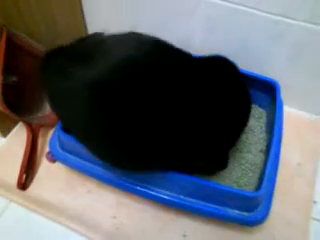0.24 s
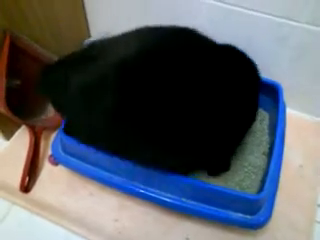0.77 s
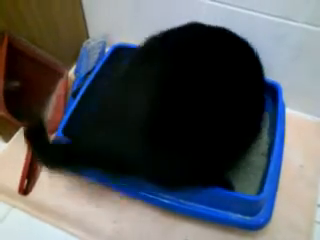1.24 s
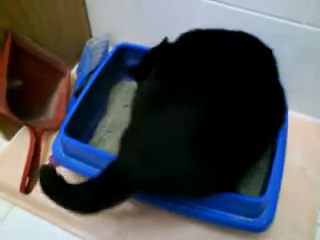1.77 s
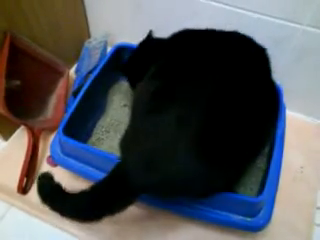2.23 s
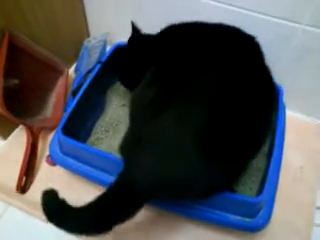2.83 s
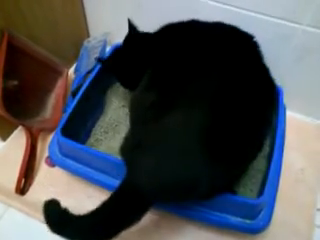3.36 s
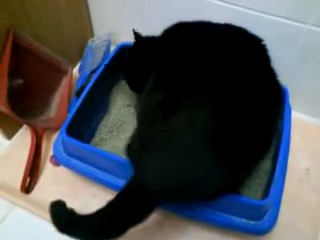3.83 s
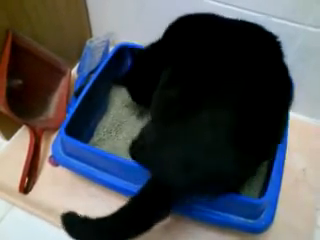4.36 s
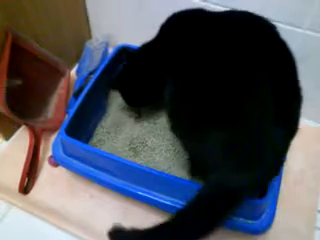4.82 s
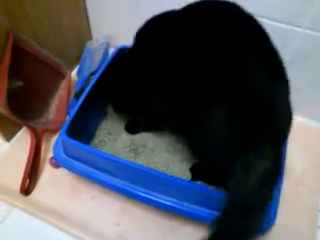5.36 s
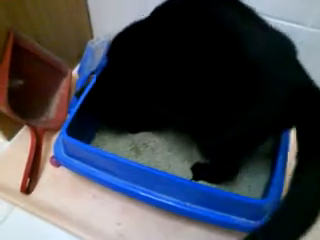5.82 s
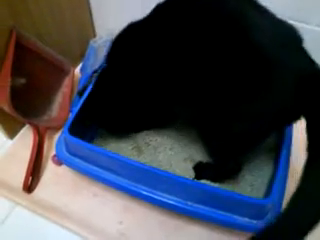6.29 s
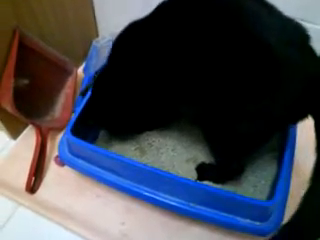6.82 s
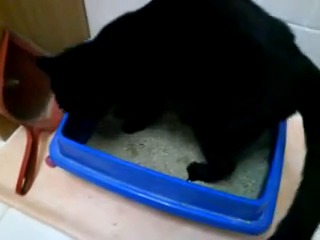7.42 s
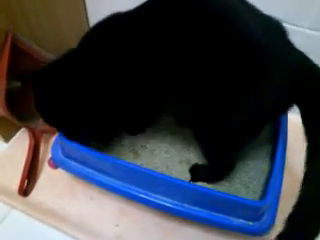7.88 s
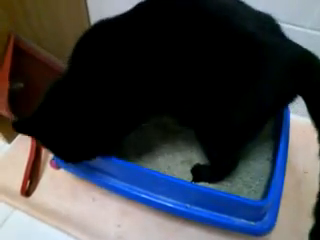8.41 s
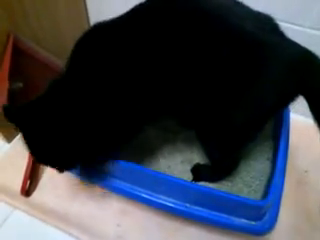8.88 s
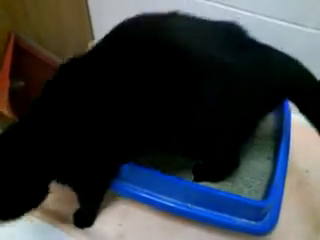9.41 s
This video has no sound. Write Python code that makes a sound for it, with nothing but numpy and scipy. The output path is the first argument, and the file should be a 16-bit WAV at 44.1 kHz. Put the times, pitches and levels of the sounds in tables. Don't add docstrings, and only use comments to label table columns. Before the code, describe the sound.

Dry granular litter is scratched in a thin plastic tray, heard close with short hard echoes from tiles and faint hiss beneath. Soft rustles and clicks come first, then a dense run of gritty scraping strokes with hollow knocks. After a lull with a few paw thuds, a sharp clatter and a couple of looser strokes return, then a small scrape and a faint step out.

```python
import sys
import numpy as np
from scipy import signal
from scipy.io import wavfile
from scipy.ndimage import uniform_filter1d

SR = 44100
rng = np.random.default_rng(int(sys.argv[2]) if len(sys.argv) > 2 else 0)


def attenuation_scalar(level_db):
    decades = np.asarray(level_db, float) / 20
    return 10 ** decades


def store_wav(level_fs):
    pcm = np.round(np.clip(np.atleast_2d(level_fs), -1, 1) * 32767)
    wavfile.write(sys.argv[1], SR, pcm.T.astype(np.int16))


N = 425609
T = np.arange(N) / SR
MUFFLE = 4.48
# (f/Hz, width/Hz, level/dB)
GRIT_MODES = [(2457, 630, 2.5), (3150, 439, 3), (3830, 483, 1), (4655, 342, -1.5), (5335, 850, 1),
              (6647, 574, -7)]


def evened(x):
    return x / np.sqrt(np.mean(x ** 2) + 1e-20)


def read(points, hz):
    f, value = np.transpose(points)
    return np.interp(np.log(hz + 1), np.log(f + 1), value)


def hiss():
    # (f/Hz, level/dB)
    floor_colour = [(20, -10), (60, 2), (120, -7.5), (222, -6), (374, -16), (827, -16), (1290, -18.5),
                    (2500, -23), (4580, -24.5), (7000, -30)]
    hz = np.fft.rfftfreq(1024, 1 / SR)
    real, imaginary, patches = rng.standard_normal((3, len(hz), N // 256 + 5))
    patches = uniform_filter1d(uniform_filter1d(patches, 14, axis=0), 12, axis=1)
    colour_db = read(floor_colour, hz)[:, None] + 1.4 * evened(patches)
    z = (real + 1j * imaginary) * attenuation_scalar(colour_db)
    noise = signal.istft(z, nperseg=1024, noverlap=768)[1][:N]
    return attenuation_scalar(-51.5) * evened(noise)


def rumble():
    # (t/s, level/dB)
    hand_shake = [
        (0, -67),
        (4.55, -63),
        (4.65, -45),
        (4.82, -50.5),
        (4.9, -61.5),
        (9.65, -60),
    ]
    s, db = np.transpose(hand_shake)
    low_band = signal.butter(2, [8, 25], "bandpass", fs=SR, output="sos")
    shake = signal.sosfilt(low_band, rng.standard_normal(N))
    return attenuation_scalar(np.interp(T, s, db)) * evened(shake)


def tiles(x):
    # (f/Hz, t60/s)
    room_decay = [(300, 0.25), (1500, 0.33), (6000, 0.1)]
    echoes = np.zeros(SR // 2)
    at = np.arange(100, SR // 2 - 20, 20)
    echoes[at + rng.integers(0, 20, len(at))] = rng.choice([-1., 1.], len(at))
    hz, t, z = signal.stft(echoes, SR, nperseg=256)
    decay = attenuation_scalar(-60 * t / read(room_decay, hz)[:, None])
    tail = signal.istft(z * decay, SR, nperseg=256)[1]
    return signal.fftconvolve(x, tail / np.linalg.norm(tail))[:N]


def ring(modes, widen=1):
    t = T[:4096]
    tap = np.zeros(len(t))
    for k, (hz, width, db) in enumerate(modes):
        decay = np.exp(-np.pi * width * widen * t)
        tap += (-1) ** k * attenuation_scalar(db) * np.sqrt(width) * decay * np.sin(2 * np.pi * hz * t)
    tap *= 1 - np.exp(-t * modes[0][0] / (0.43 * widen))
    return tap / np.linalg.norm(tap)


def granules(per_s, spread_db, clump):
    size = attenuation_scalar(spread_db * np.minimum(rng.exponential(1, N), 5)) * rng.choice([-1., 1.], N)
    lands = rng.random(N) < per_s / SR
    return evened(size * lands * attenuation_scalar(clump))


def rubs():
    # (start t/s, end t/s, f/Hz, width/Hz, level/dB)
    rubbed_spots = [(0.35, 0.386, 1800, 200, -50), (0.895, 1.004, 1100, 300, -50),
                    (0.898, 0.924, 1980, 200, -50), (1.247, 1.483, 170, 120, -51),
                    (1.25, 1.46, 270, 59.7, -43), (1.286, 1.453, 880, 250, -48),
                    (1.312, 1.353, 3930, 180, -47), (1.44, 1.494, 4150, 350, -59),
                    (6.96, 7.008, 3800, 200, -50), (6.367, 6.421, 4500, 900, -29.5),
                    (6.953, 6.985, 2070, 250, -49), (1.306, 1.346, 2250, 250, -48),
                    (3.064, 3.14, 2220, 200, -38.5), (3.584, 3.702, 2110, 300, -47),
                    (3.315, 3.473, 1460, 130, -36), (4.592, 4.62, 1300, 900, -51),
                    (7.736, 7.767, 1100, 906, -51), (4.221, 4.31, 1430, 200, -55.5),
                    (4.24, 4.307, 640, 150, -59), (5.41, 5.53, 1040, 500, -53),
                    (5.8, 5.895, 487, 199, -45.5), (6.08, 6.212, 1090, 250, -46.5),
                    (6.654, 6.775, 171, 100, -51.5), (6.762, 6.81, 4920, 200, -61),
                    (7.886, 8.09, 1110, 400, -43), (9.257, 9.335, 980, 300, -52.5),
                    (9.455, 9.597, 1980, 497, -57.5)]
    out, taps = np.zeros(N), granules(3000, 1.7, 0)
    for start, end, hz, width, db in rubbed_spots:
        part = slice(round(start * SR), round(end * SR))
        stroke = taps[part] * signal.windows.tukey(part.stop - part.start, .4)
        tone = signal.fftconvolve(stroke, attenuation_scalar(db) * ring([(hz, width, 0)]))
        out[part.start:][:len(tone)] += tone[:N - part.start]
    return out


def pop():
    # (t/s, peak level/dB, f/Hz, t60/s)
    claw_pops = [(.48, -44, 4000, .0043), (.9507, -24, 260, .012), (.954, -37, 1220, .022),
                 (1.254, -35, 350, .018), (1.4325, -36, 2400, .008), (1.4325, -38.5, 5600, .006),
                 (1.486, -26, 180, .01), (1.728, -32, 3400, .0026), (2.1402, -30.5, 900, .0043),
                 (2.5625, -24, 5500, .006), (2.574, -25, 5500, .006), (2.6652, -19, 890, .007),
                 (2.6655, -24, 1600, .006), (2.7685, -28, 1500, .014), (3.1545, -25, 5200, .004),
                 (3.1547, -20.5, 2600, .0062), (3.7946, -34.5, 1400, .013), (4.386, -41.5, 3500, .0034),
                 (4.598, -41, 1300, .011), (4.9865, -32, 620, .015), (5, -42, 1150, .012),
                 (5.2577, -34, 2200, .005), (5.2578, -42, 4400, .004), (5.26, -32, 620, .02),
                 (6.0824, -25.5, 1500, .0044), (6.398, -15, 2000, .006), (6.631, -38, 2100, .008),
                 (6.667, -24, 2220, .0072), (6.667, -36.5, 3400, .01), (6.668, -28, 1250, .008),
                 (6.8179, -22.5, 1200, .0067), (7.0128, -19.5, 660, .013), (7.013, -22, 1700, .007),
                 (7.0145, -21, 5100, .004), (8.049, -23, 990, .0061), (9.205, -33.5, 4850, .004),
                 (9.205, -36, 1100, .007)]
    out, ticks = np.zeros(N), np.zeros(N)
    for s, db, hz, t60 in claw_pops:
        t = np.maximum(T - s, 0)
        onset = 1 - np.exp(-t * hz / 0.33)
        out += 1.78 * attenuation_scalar(db - 60 * t / t60) * np.sin(2 * np.pi * hz * t) * onset
        ticks[round(s * SR)] += attenuation_scalar(db) * min(hz / 1500, 1)
    return out + .22 * signal.oaconvolve(ticks, ring(GRIT_MODES, MUFFLE))[:N]


def slaps():
    # (t/s, level/dB, f/Hz)
    pad_slaps = [
        (1.7275, -21.5, 704),
        (4.3854, -30, 1000),
        (5.2574, -16, 634),
    ]
    out = np.zeros(N)
    for s, db, hz in pad_slaps:
        turn = np.clip((T - s) * hz, 0, 1)
        out += attenuation_scalar(db) * np.sin(2 * np.pi * turn) * np.sin(np.pi * turn)
    return out


def knocks(column):
    # (t/s, floor level/dB, rim level/dB, grit level/dB)
    knock_rows = [(.37, -47, -38, -57), (0.421, -54.5, -33.5, -57.5), (.951, -35, -30, -49.5),
                  (1.342, -53, -49, -39), (1.433, -48, -39, -34), (1.468, -46, -43, -39),
                  (1.757, -29, -28, -36), (2.14, -20.5, -27, -21), (2.262, -18, -20, -42),
                  (2.284, -26, -18, -31), (2.446, -16, -39, -19), (2.562, -45, -44, -23),
                  (2.664, -19.5, -22, -29), (2.682, -27, -28, -20.5), (2.769, -34, -23, -26.5),
                  (3.154, -35, -19.5, -20), (3.305, -38, -47, -37), (3.793, -42, -43, -41),
                  (4.597, -50, -37, -41), (4.986, -34, -32, -48), (5.853, -43, -32, -36.5),
                  (6.079, -45, -45, -32.5), (6.1, -39.5, -28, -37), (6.369, -29, -19, -19),
                  (6.374, -22, -12, -15.5), (6.395, -28, -21, -29), (6.667, -32, -22, -34),
                  (6.926, -40, -38, -38), (7.012, -38, -35, -38), (7.739, -47, -39.5, -43),
                  (9.204, -61.5, -53, -37)]
    scatter_t60 = 0.058
    tap, scatter = np.zeros(N), np.zeros(N)
    for row in knock_rows:
        at, size = round(row[0] * SR), attenuation_scalar(row[column - 1])
        tap[at] += size
        tail = scatter[at:at + 8000]
        tail += size * attenuation_scalar(-60 * T[:len(tail)] / scatter_t60)
    return tap, scatter


def scrapes(column):
    # (start t/s, end t/s, floor level/dB, rim level/dB, grit level/dB)
    claw_drags = [(1.762, 1.834, -47, -45, -48), (2.276, 2.392, -32.5, -38, -43),
                  (2.662, 2.684, -35.5, -26.5, -42), (2.778, 2.916, -43.5, -36, -51),
                  (2.787, 2.874, -37.5, -48, -42.5), (3.298, 3.478, -41, -32.5, -42.5),
                  (4.434, 4.52, -66, -60, -69), (5.406, 5.523, -58, -54, -79), (6.09, 6.136, -45, -58, -59),
                  (6.363, 6.425, -32.5, -30, -40), (6.787, 6.863, -45, -41.5, -54.5),
                  (6.922, 6.986, -46.5, -47, -45)]
    out = np.zeros(N)
    for row in claw_drags:
        out += attenuation_scalar(row[column]) * np.clip(np.minimum(T - row[0], row[1] - T) / 0.01, 0, 1)
    return out


def strokes(rows, db=0, bite_share=0):
    slow = T[::32]
    rows = np.array(rows)[:, :, None]
    late = slow - rows[:, 0]
    off = np.where(late < 0, -late / abs(rows[:, 2]), late / abs(rows[:, 3]))
    bite_db = bite_share * rows[:, -1]
    stroke_db = rows[:, 1] + db + bite_db - 20 * off ** 1.3
    return np.interp(T, slow, (attenuation_scalar(stroke_db) ** 2).sum(0))


def lumps(rows, swell_s):
    hold_before, hold_after, held_db = 2.2, 3.2, -6
    sound, held = np.zeros(N), np.zeros(N)
    u = T[:1500] / swell_s
    swell = u * np.exp(1 - u)
    for s, db, hz in rows:
        at = round((s - 0.39 * swell_s) * SR)
        sound[at:at + 1500] += attenuation_scalar(db - 1.3) * swell * np.sin(2 * np.pi * hz * T[:1500])
        held[at - round(hold_before * swell_s * SR):at + round(hold_after * swell_s * SR)] = 1
    return sound, attenuation_scalar(held_db * uniform_filter1d(held, round(swell_s * SR) + 1))


def shifting(x):
    hz, t, z = signal.stft(x, SR, nperseg=512)
    patches = rng.standard_normal(z.shape)
    patches = evened(uniform_filter1d(uniform_filter1d(patches, size=5, axis=0), size=10, axis=1))
    drift_db = 1.4 * patches * np.clip(hz / 800, .3, 1)[:, None]
    return signal.istft(z * attenuation_scalar(drift_db), SR, nperseg=512)[1][:N]


def digging():
    # (f/Hz, width/Hz, level/dB)
    floor_modes = [(497, 52.6, -4), (558.4, 43.5, -4.5), (621, 46, -1.5), (729, 76, -2.5), (815, 61.8, -2),
                   (1033, 370, -0.5)]
    wall_modes = [(190, 79, -6), (270, 31.3, 2), (324.7, 33.6, 3), (440, 55, 1.5)]
    rim_modes = [(1255, 82, -5.5), (1399, 111, 2.5), (1498, 140, 3), (1833, 108, -5), (2010, 75, -6.5),
                 (2406, 310, -8)]
    # (taps per s, spread of size/dB, clumping/dB)
    granule_kinds = [(1506, 1.5, 0.5), (2550, 1.5, 0.5), (2636, 2.5, 1), (5380, 1.5, 0.5)]
    # (stroke level/dB, share of claw bite, stir level/dB)
    part_answers = [(-1.5, 0.04, -1), (-9.5, 0.28, 1), (-2.5, 0.96, -4), (-8.5, 0.42, -7.5)]
    # (t/s, level/dB)
    weight_stir = [(0, -61.5), (.24, -60.5), (.56, -57), (.88, -60.5), (1.18, -63), (1.64, -63),
                   (3.79, -55), (3.98, -64.5), (4.92, -58), (5.3, -60.5), (5.6, -61.5), (6.04, -59),
                   (7.23, -61.5), (7.71, -65.5), (8.28, -62), (9.14, -68), (9.33, -61), (9.65, -58)]
    # (peak t/s, level/dB, rise/s, fall/s, claw bite/dB)
    paw_steps = [(.33, -46, 0.17, 0.22, -8.5), (.97, -49.5, 0.23, 0.16, 3.5), (1.29, -46.5, 0.14, 0.11, -3),
                 (1.38, -48.5, .1, 0.26, -1.5), (1.45, -47.5, 0.18, 0.34, -10),
                 (5.0, -41, 0.099, 0.099, -4), (5.13, -50, 0.45, 0.16, -10), (5.26, -49, 0.096, 0.047, 0.5),
                 (5.51, -49, 0.17, 0.13, -10), (7.79, -45.5, 0.096, 0.1, -7),
                 (7.96, -37.5, 0.12, 0.22, -2.5), (8.06, -36.5, 0.17, 0.063, -2.5),
                 (8.14, -58, .1, 0.13, -7), (9.51, -54, .35, 0.41, -2)]
    first_dig = [(1.87, -33.5, 0.091, 0.18, 3.5), (1.97, -32.5, 0.24, 0.17, -6),
                 (2.19, -41, 0.059, 0.097, 4.5), (2.31, -27, 0.11, 0.1, 3), (2.4, -31, 0.07, 0.18, -10),
                 (2.5, -32.5, 0.16, 0.14, 0.5), (2.7, -39, 0.075, .2, 1), (2.851, -29, 0.12, 0.14, 3.5),
                 (2.96, -32.5, 0.17, 0.23, -5), (3.03, -36, 0.17, 0.08, -8), (3.12, -33, 0.13, 0.067, -3),
                 (3.22, -35.5, .1, 0.13, -0.5), (3.34, -31.5, 0.076, 0.17, 0.5),
                 (3.43, -30.5, 0.099, 0.12, 1.5), (3.55, -36.5, 0.17, 0.22, -6),
                 (3.68, -48, 0.17, 0.13, 0.5)]
    second_dig = [(5.85, -40, .09, 0.22, -6), (6.1, -49, 0.16, 0.17, -1), (6.23, -40, 0.11, 0.22, 1),
                  (6.4, -29.5, 0.053, 0.15, 1.5), (6.48, -38.5, 0.15, 0.13, -0.5),
                  (6.69, -41.5, 0.046, 0.15, -4), (6.82, -42.5, 0.23, 0.29, 0.5),
                  (6.94, -36, 0.03, 0.12, -2), (7.0, -32.5, 0.077, 0.14, 0), (7.09, -45, 0.11, 0.037, -5),
                  (7.14, -57, .06, 0.13, -3), (7.4, -62.5, 0.22, 0.12, 4.5)]
    # (peak t/s, level/dB, rise/s, fall/s)
    wall_leans = [(1.29, -44, 0.19, 0.069), (1.77, -46, 0.06, .1), (2.28, -36.5, 0.12, .14),
                  (2.39, -37.5, 0.1, 0.12), (2.69, -43, 0.06, 0.14), (2.85, -40, .07, 0.11),
                  (3.44, -37.5, 0.12, 0.056), (3.66, -54, .2, 0.19), (5.27, -55, 0.069, .03),
                  (6.15, -48.5, 0.25, 0.26), (6.42, -40, 0.05, 0.16), (6.99, -39, 0.091, 0.045),
                  (7.07, -50, .08, 0.081)]
    # (peak t/s, level/dB, rise/s, fall/s)
    grit_sprays = [(1.34, -51.5, 0.074, 0.054), (1.45, -50, 0.082, 0.13), (1.74, -53, 0.073, .1),
                   (1.86, -37.5, 0.033, 0.31), (2.15, -46, 0.024, 0.13), (2.36, -35.5, 0.11, 0.24),
                   (2.58, -32, 0.17, 0.08), (2.64, -41.5, .06, 0.18), (2.85, -31.5, .06, 0.13),
                   (3.06, -36.5, 0.3, .2), (3.17, -32, 0.13, 0.1), (3.41, -31, 0.14, 0.15),
                   (3.66, -43, 0.39, 0.09), (6.1, -50.5, 0.058, 0.18), (6.4, -31, 0.026, 0.16),
                   (6.62, -55.5, .1, .15), (7.02, -35.5, 0.044, 0.12), (7.08, -50, .08, 0.086),
                   (8.04, -48.5, 0.1, 0.11), (5.0, -58, 0.05, .04), (8.4, -57.5, 0.055, 0.085),
                   (9.225, -59, 0.022, .06)]
    # (t/s, peak level/dB, f/Hz)
    floor_lumps = [(1.7571, -33, 760), (1.807, -28, 710), (1.877, -30, 650), (1.9095, -29, 740),
                   (1.9401, -27.5, 720), (1.9857, -27, 766), (2.159, -32, 730), (2.237, -27.5, 630),
                   (2.2805, -22, 665), (2.2988, -21, 627), (2.3082, -18, 720), (2.3459, -23, 624),
                   (2.375, -29, 730), (2.3943, -24.5, 673), (2.4071, -28, 665), (2.4471, -25, 810),
                   (2.4827, -29, 710), (2.5034, -29, 790), (2.6775, -26, 680), (2.7996, -21.5, 637),
                   (2.8111, -19.5, 645), (2.8344, -19, 690), (2.8609, -20, 640), (2.9029, -23.5, 560),
                   (2.9151, -25, 627), (3.0311, -27.5, 636), (3.1893, -28.5, 726), (3.2357, -28.5, 624),
                   (3.3366, -23, 657), (3.3607, -26, 706), (3.388, -27, 720), (3.4038, -22.5, 650),
                   (3.4167, -24, 690), (3.4407, -21, 662), (3.4679, -23.5, 650), (3.555, -28, 630),
                   (3.587, -27.5, 640), (4.957, -37, 616), (4.9932, -31, 650), (5.087, -40, 630),
                   (5.1396, -41, 680), (5.8285, -40, 655), (6.3835, -20, 710), (6.3918, -18, 694),
                   (6.4235, -21.5, 710), (6.4579, -27.5, 660), (6.926, -31, 710), (6.97, -26, 660),
                   (6.9919, -22, 680), (7.0753, -33, 730), (7.093, -33, 650), (7.972, -32, 630),
                   (7.998, -29, 620), (8.047, -26.5, 664)]
    rim_lumps = [(0.3706, -33, 1770), (0.3891, -40, 1820), (0.4241, -43, 1790), (1.823, -29, 1550),
                 (1.8655, -25, 1510), (1.9175, -25, 1570), (2.271, -19, 1390), (2.2846, -15.5, 1470),
                 (2.3039, -16, 1490), (2.316, -24, 1540), (2.347, -21, 1490), (2.369, -22, 1500),
                 (2.6827, -22.5, 1500), (2.7679, -23, 1505), (2.785, -27, 1710), (2.8029, -22.5, 1470),
                 (2.8354, -22, 1530), (2.8735, -19, 1510), (2.882, -19, 1575), (2.916, -22, 1450),
                 (3.1239, -27, 1900), (3.1533, -28, 1880), (3.1902, -24, 1520), (3.306, -23.5, 1406),
                 (3.3244, -19.5, 1510), (3.3394, -24, 1570), (3.35, -24, 1500), (3.404, -21, 1480),
                 (3.421, -22, 1550), (3.4425, -23, 1560), (3.4766, -22.5, 1400), (3.6155, -40, 2040),
                 (3.653, -31.5, 2010), (4.5974, -44, 1790), (4.9547, -39, 1410), (4.988, -32, 1510),
                 (4.9947, -30.5, 1450), (5.0595, -39, 1490), (6.0946, -34, 1470), (6.1026, -30, 1440),
                 (6.1166, -34, 1380), (6.185, -36, 1380), (6.281, -31, 1480), (6.3755, -16.5, 1570),
                 (6.3966, -19, 1760), (6.4235, -18, 1530), (6.445, -23.5, 1810), (6.5296, -28, 1470),
                 (6.832, -31, 1500), (6.847, -29.5, 1450), (6.9271, -30, 1840), (7.952, -35, 1200),
                 (8.131, -38, 1320)]
    grit_lumps = [(1.3377, -39, 3460), (1.433, -42, 3960), (1.842, -29, 3380), (2.0676, -35, 4010),
                  (2.2193, -30, 3690), (2.317, -19, 3930), (2.4471, -28, 3900), (2.5634, -27, 4400),
                  (2.5726, -27, 4570), (2.582, -26, 3610), (2.6802, -32, 3710), (2.8019, -24, 3520),
                  (2.841, -20.5, 4270), (2.9944, -28.5, 4180), (3.0342, -34, 3950), (3.154, -28, 3350),
                  (3.196, -30, 4250), (3.3157, -31, 3550), (3.3877, -30, 3980), (3.5746, -28, 3600),
                  (3.6151, -29.5, 3680), (5.8653, -36, 3500), (6.3693, -29, 4400), (6.3773, -15.5, 4150),
                  (6.3923, -26, 4210), (6.4005, -18, 4300), (6.6319, -42, 4390)]
    lump_swells = [.0022, 0.0014, .00045]

    paws = paw_steps + first_dig + second_dig
    stir = attenuation_scalar(2 * np.interp(T, *np.transpose(weight_stir)))
    bite_db = 10 * np.log10((strokes(paws, 0, 1.0) + stir) / (strokes(paws) + stir))
    bare = np.clip(0.56 + 0.04 * bite_db, 0, 1)
    clumps = evened(uniform_filter1d(uniform_filter1d(rng.standard_normal(N), 500), 300))
    caught = [lumps(*kind) for kind in zip((floor_lumps, rim_lumps, grit_lumps), lump_swells)]

    modes = (floor_modes, wall_modes, rim_modes, GRIT_MODES)
    extras = (0, strokes(wall_leans), 0, strokes(grit_sprays))
    columns = (2, None, 3, 4)
    out, hard = np.zeros(N), np.zeros(N)
    for part, answer, extra, kind, column in zip(modes, part_answers, extras, granule_kinds, columns):
        stroke_db, share, stir_db = answer
        per_s, spread_db, clump_db = kind
        clear, dull = ring(part), ring(part, MUFFLE)
        press = np.sqrt(strokes(paws, stroke_db, share) + extra + stir * attenuation_scalar(2 * stir_db))
        tap, scatter = knocks(column) if column else (np.zeros(N), 0)
        claws = scrapes(column) if column else 0
        taps = granules(per_s, spread_db, clump_db * clumps)
        on_bare = taps * np.hypot(bare * np.hypot(press, 0.18 * scatter), claws)
        in_litter = (1 - bare) * taps * np.hypot(press, 0.55 * scatter)
        knock = .5 * tap / abs(dull).max()
        loose = signal.oaconvolve(on_bare, clear)[:N]
        loose += signal.oaconvolve(in_litter + knock, dull)[:N]
        lump_sound, held = caught[column - 2] if column else (0, 1)
        out += held * loose
        hard += lump_sound
    return shifting(out) + hard


def scene():
    tray = digging() + rubs() + pop()
    echo = attenuation_scalar(-11.5) * tiles(tray)
    return (tray + echo + slaps() + hiss() + rumble())[None]


def roll_off(x):
    return signal.sosfilt(signal.butter(12, 7680, fs=SR, output="sos"), x)


def record(dry):
    return roll_off(dry)


dry = scene()
out = record(dry)
store_wav(out)
```